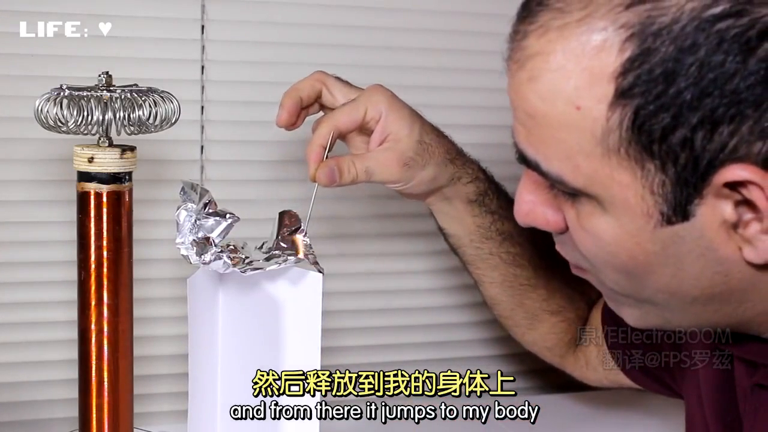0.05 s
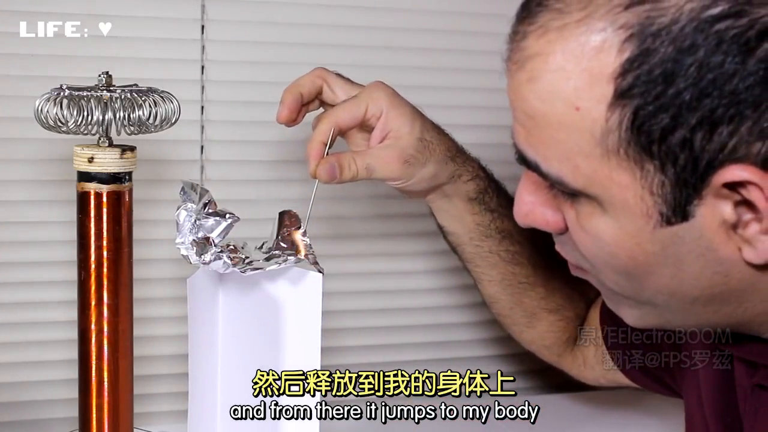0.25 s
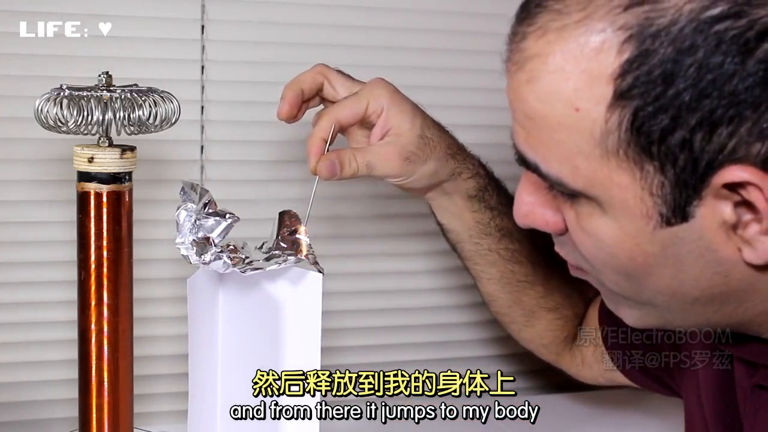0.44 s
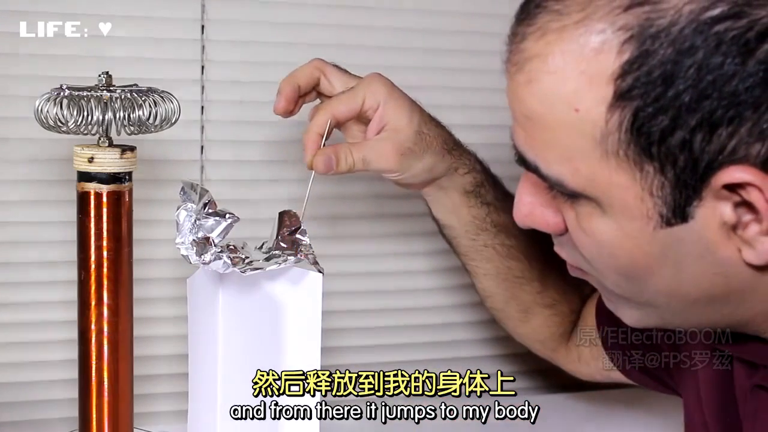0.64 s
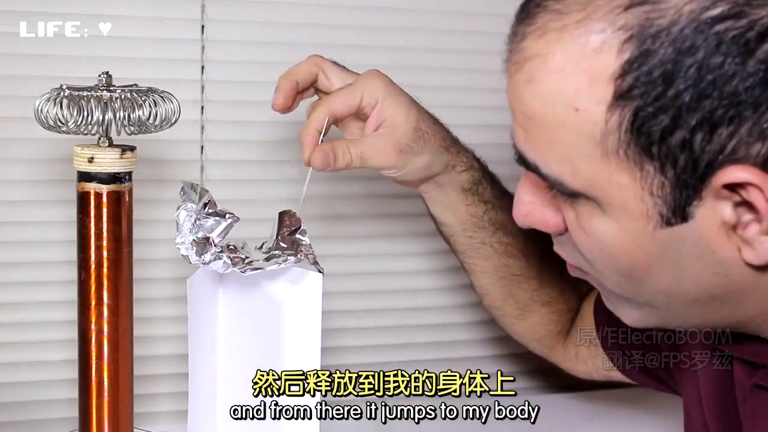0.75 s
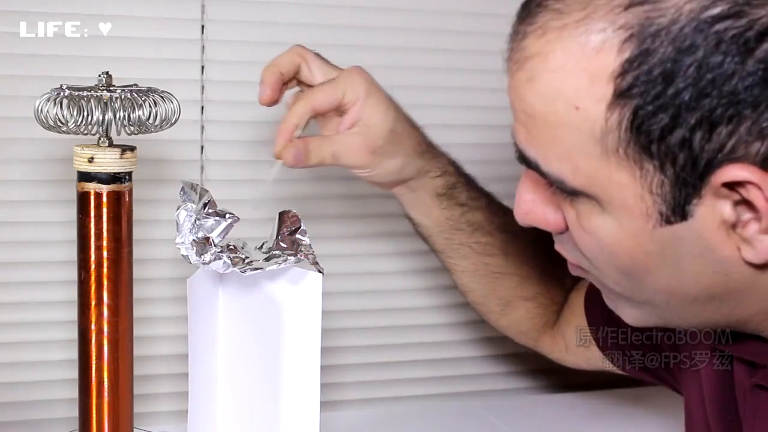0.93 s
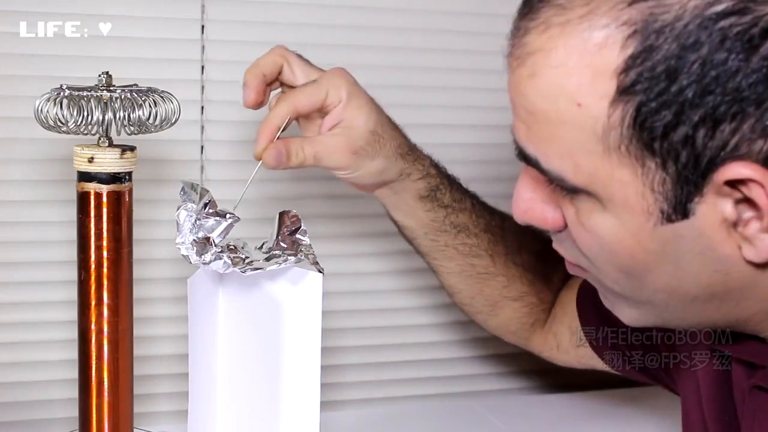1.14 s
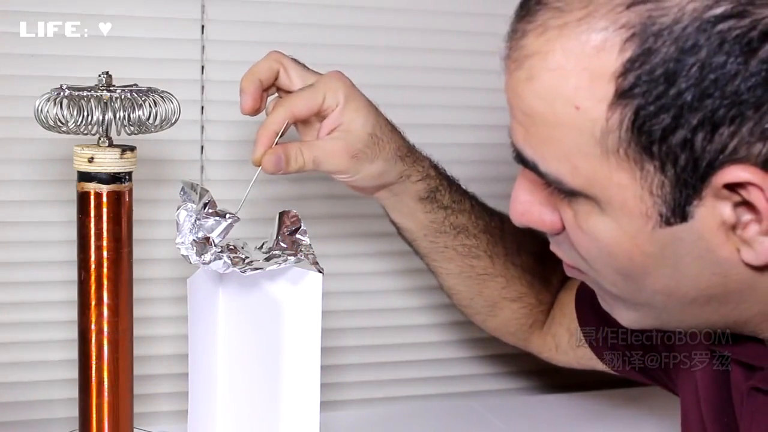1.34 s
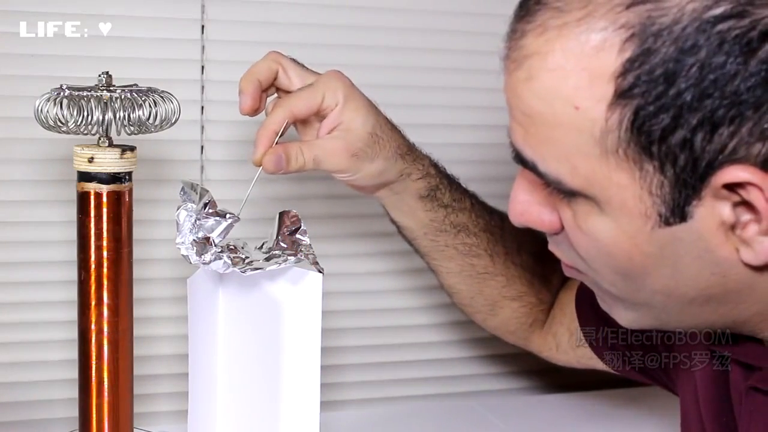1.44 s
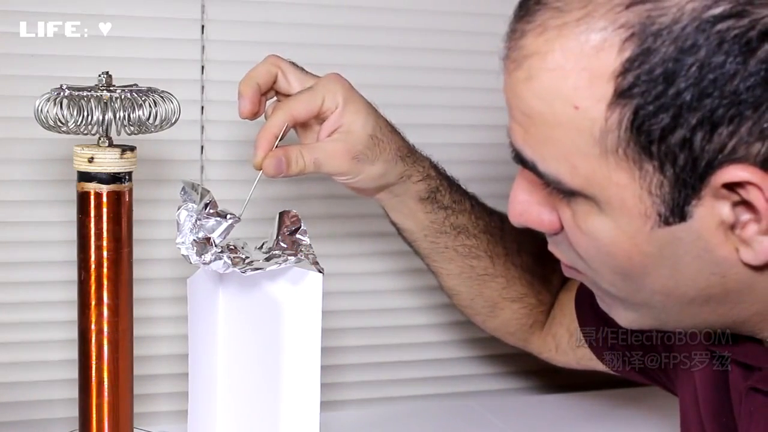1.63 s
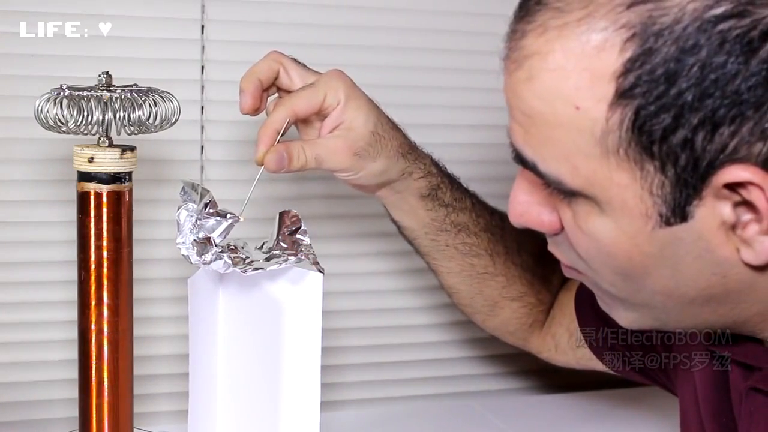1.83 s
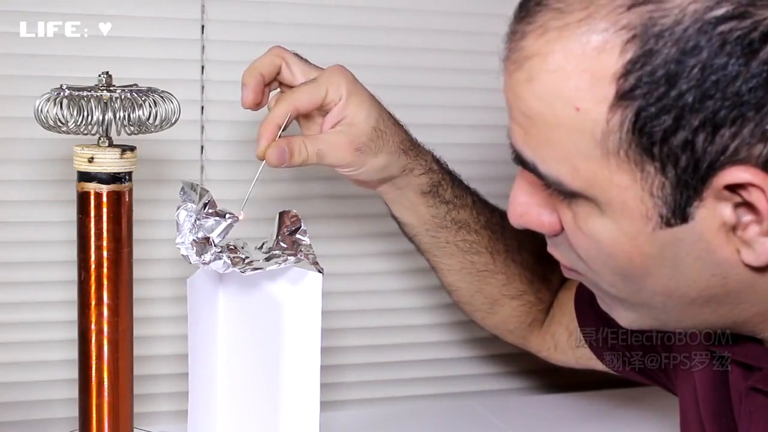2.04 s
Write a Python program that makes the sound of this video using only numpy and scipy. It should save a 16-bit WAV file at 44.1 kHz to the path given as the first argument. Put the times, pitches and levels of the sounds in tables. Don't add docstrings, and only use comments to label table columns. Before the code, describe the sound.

A bright, mains-throbbing electric arc sizzles between a metal needle and crumpled foil, dies abruptly, leaves quiet room hum and hiss, then two dull sputters lead to a weaker, growing fizz; close stereo microphone, small room.

```python
import sys
import numpy as np
from scipy import signal
from scipy.fft import rfft, irfft
from scipy.io import wavfile
from scipy.ndimage import uniform_filter1d

SR = 44100
rng = np.random.default_rng(int(sys.argv[2]) if len(sys.argv) > 2 else 0)


def linear_from_db(decibels):
    return 10 ** (np.asarray(decibels, float) / 20)


def wav_record(signal):
    frames = np.transpose(np.atleast_2d(signal))
    bounded = np.clip(frames, -1, 1)
    quanta = np.round(bounded * 32767).astype(np.int16)
    wavfile.write(sys.argv[1], SR, quanta)


N = 91772


def unit(x):
    return x / np.sqrt(np.mean(x ** 2))


def on_log_hz(points, hz):
    p = np.array(points, float)
    return np.interp(np.log(np.maximum(hz, 1)), np.log(p[:, 0]), p[:, 1])


def colour(x, points):
    hz = np.arange(x.shape[-1] // 2 + 1) * SR / x.shape[-1]
    return irfft(rfft(x) * linear_from_db(on_log_hz(points, hz)), x.shape[-1])


def ring(x, hz, width):
    return signal.lfilter(*signal.iirpeak(hz, hz / width, fs=SR), x)


def walk(rate):
    k = int(SR / rate)
    return unit(uniform_filter1d(uniform_filter1d(rng.standard_normal(N), k), k))


# frequency in Hz, density in dB per Hz.
HISS_COLOUR = [(20, -28), (60, -8.5), (200, -3), (600, -8), (2000, -14.5), (6000, -17.5), (7500, -20.5),
               (15500, -25.5)]
# frequency in Hz, width in Hz, level in dB.
HUM_RINGS = [(41.7, 4, -69.5), (94.4, 13, -64.5), (150, 7.5, -69.5), (183, 45, -59), (355.3, 30, -68.5)]
# frequency in Hz, side minus mid in dB.
BACKGROUND_SIDE = [(60, -3), (110, -9), (200, -5.5), (380, -0.5), (700, 5), (1290, 5), (2380, 5.5),
                   (4400, 2.5), (8120, 1.5), (15000, -2.5)]


def hum_and_hiss():
    hiss_db = -59
    sound = linear_from_db(hiss_db) * unit(colour(rng.standard_normal(N), HISS_COLOUR))
    for hz, width, db in HUM_RINGS:
        sound = sound + linear_from_db(db) * unit(ring(rng.standard_normal(N), hz, width))
    return sound


def background():
    lean_db = -0.5
    mid = hum_and_hiss()
    side = colour(hum_and_hiss(), BACKGROUND_SIDE)
    return np.array([(mid + side) * linear_from_db(lean_db / 2), (mid - side) * linear_from_db(-lean_db / 2)])


def even(response):
    smooth_hz, size = 250, response.shape[1]
    power = np.mean(np.abs(rfft(response)) ** 2, axis=0)
    power = uniform_filter1d(power, size=int(smooth_hz * size / SR))
    taps = np.roll(irfft(1 / np.sqrt(power), size), 256)[:513] * np.hanning(513)
    return signal.fftconvolve(response, taps[None], axes=1)


# frequency in Hz, time to fall 60 dB in seconds.
TAIL_T60 = [(500, 0.74), (1500, 0.26), (2500, 0.35), (4500, 0.34), (6400, 0.3), (7400, 0.24), (10000, 0.12),
            (14000, 0.053)]
# frequency in Hz, side minus mid in dB.
TAIL_SIDE = [(500, -6), (1000, -12.5), (2000, -10.5), (4000, -2), (8000, -7.5), (14000, -17)]
# left delay in ms, right delay in ms, level in dB.
NEAR_ECHOES = [
    (.26, 0.284, -9.5),
    (1.6, 1.58, -9.5),
    (2.18, 2.21, -4.5),
    (2.82, 2.78, -3.5),
]


def room_tail(t):
    tail = 0
    for hz in 350 * 2 ** np.arange(0, 5.6, 1 / 3):
        mid, side = rng.standard_normal((2, len(t)))
        noise = mid + linear_from_db(on_log_hz(TAIL_SIDE, hz)) * side * np.array([[1], [-1]])
        band = ring(ring(noise, hz, hz / 3), hz, hz / 3)
        tail = tail + band * linear_from_db(-60 * t / on_log_hz(TAIL_T60, hz))
    return tail


def room(x):
    tail_db, build_s, left_lag_ms = 2, 0.0037, 0.01
    size = SR // 2
    t = np.arange(size) / SR
    tail = room_tail(t)
    response = linear_from_db(tail_db) * tail * np.clip(t / build_s, 0, 1) / np.sqrt(np.sum(tail ** 2) / 2)
    near = np.arange(256)
    for left_ms, right_ms, db in [(left_lag_ms, 0, 0)] + NEAR_ECHOES:
        delay = np.array([[left_ms], [right_ms]]) * SR / 1000
        response[:, near] += linear_from_db(db) * np.sinc(near - 16 - delay)
    response = even(response)
    lead = np.concatenate([x[size:0:-1], x])
    start = size + 272
    wet = signal.fftconvolve(lead[None], response, axes=1)[:, start:start + N]
    return wet / np.sqrt(np.sum(response ** 2) / 2)


def snaps():
    per_s, spread_db, top_db = 6000, 2.5, 9
    hit = rng.random(N) < per_s / SR
    level_db = np.minimum(spread_db * rng.exponential(size=N), top_db)
    return unit(hit * rng.choice([-1, 1], N) * linear_from_db(level_db))


def body(x, points, rings, ring_db):
    wander_db = 1.5
    rung = 0
    for hz, width, db in rings:
        rung = rung + linear_from_db(db + wander_db * walk(14.4)) * unit(ring(x, hz, width))
    return unit(unit(colour(x, points)) + linear_from_db(ring_db) * unit(rung))


# start in seconds, level in dB, rise in s, hold in s, 60 dB fall in s.
TOUCHES = [
    (1.655, -40, 0.013, 0.03, 0.086),
    (1.74, -37.5, 0.0063, 0.0023, 0.11),
]
# frequency in Hz, density in dB per Hz.
TOUCH_COLOUR = [(290, -37), (500, -16), (1010, -8), (1090, -9), (1820, -4.5), (2290, -9), (6000, -10.5),
                (13600, -45), (15500, -53)]
# frequency in Hz, width in Hz, level in dB.
TOUCH_RINGS = [(1026, 14, -2), (1395, 48, -6), (1820, 140, -1.5), (3300, 200, -7), (4350, 290, 0),
               (5400, 150, -4), (9900, 300, -9.5)]


def sputter(t):
    shape = 0
    for at, db, rise, hold, t60 in TOUCHES:
        swell = np.clip((t - at) / rise, 0, 1)
        fall = linear_from_db(-60 * np.clip(t - at - rise - hold, 0, 1) / t60)
        shape = shape + linear_from_db(db) * swell * fall
    return shape * body(snaps(), TOUCH_COLOUR, TOUCH_RINGS, ring_db=-4)


# time in seconds, level in dB, treble lift in dB.
STRONG_ARC = [
    (0, -23.5, 7),
    (.06, -26.5, 4.5),
    (.12, -27.5, 5),
    (.23, -22.5, 7.5),
    (.35, -25, 2.5),
    (0.408, -23, 6),
    (.6, -25.5, 4),
    (0.666, -29.5, 2),
    (0.701, -61.5, 21.5),
]
# time in seconds, level in dB, treble lift in dB.
WEAK_ARC = [
    (1.615, -56, -9),
    (1.635, -51.5, -5),
    (1.8, -53, 3),
    (1.83, -45.5, -2),
    (1.915, -45.5, 2.5),
    (1.935, -42, -3),
    (2.004, -42, 4.5),
    (2.029, -33, -1),
    (2.08, -35.5, 3),
]
# frequency in Hz, density in dB per Hz.
STRONG_COLOUR = [(300, -37), (700, -22), (1300, -20), (1700, -5.5), (5500, -1.5), (7200, -8.5),
                 (10000, -12), (15500, -31.5)]
# frequency in Hz, width in Hz, level in dB.
STRONG_RINGS = [(291, 16, -17), (788, 16, -20), (1260, 110, 0), (1641, 110, 3), (2085, 103, -1.5),
                (2360, 240, -2), (3395, 430, 6.5), (4730, 160, 4), (5170, 100, -20), (5430, 110, 3),
                (9170, 400, 3.5), (10400, 600, -3), (11560, 470, -2.5), (12200, 250, -12)]
# frequency in Hz, density in dB per Hz.
WEAK_COLOUR = [(290, -8), (500, -8), (1700, 0.5), (2890, -4.5), (3900, -8.5), (5920, -2.5), (7340, -14),
               (9930, -9.5), (15500, -22.5)]
# frequency in Hz, width in Hz, level in dB.
WEAK_RINGS = [(2020, 20, -1), (3410, 54, 3.5), (3890, 200, 5), (5820, 52, 1), (6640, 29, -17),
              (8600, 80, -11), (9700, 94, -5), (9700, 89, -14)]


def arc(t):
    mains_hz, throb_db, throb_sharp, double_throb_db = 60.1, 6, 5.0, .8
    flicker_db, bright_hz, foil_db = .6, 7240, -6
    strong = t < 1
    phase_turns = np.where(strong, 0.0033, .5)
    turn = 2 * np.pi * (mains_hz * t - phase_turns)
    throb = throb_db * np.exp(throb_sharp * (np.cos(turn) - 1)) + double_throb_db * np.cos(2 * turn)
    throb_share = np.where(strong, 1, .25)
    clicks = snaps() * linear_from_db(throb * throb_share + flicker_db * walk(60))
    strong_hiss = body(clicks, STRONG_COLOUR, STRONG_RINGS, foil_db)
    weak_hiss = body(clicks, WEAK_COLOUR, WEAK_RINGS, foil_db)
    hiss = np.where(strong, strong_hiss, weak_hiss)

    silence = [(.72, -134.5, 0.0034), (1.6, -93, 0)]
    at, level_db, treble_db = np.array(STRONG_ARC + silence + WEAK_ARC, float).T
    top = signal.sosfilt(signal.butter(2, bright_hz, "high", fs=SR, output="sos"), hiss)
    lift_db = np.interp(t, at, treble_db) + 1.1 * throb * (t > 1)
    hiss = hiss + (linear_from_db(lift_db) - 1) * top
    return hiss * linear_from_db(np.interp(t, at, level_db))


def scene():
    creep_turns_per_s = .35
    t = np.arange(N) / SR
    sparks = arc(t) + sputter(t)
    place = 2 * np.pi * creep_turns_per_s * t
    return room(sparks * np.cos(place) ** 2) + room(sparks * np.sin(place) ** 2) + background()


def roll_off(x):
    return signal.sosfilt(signal.butter(12, 15780, fs=SR, output="sos"), x)


def record(dry):
    top_cut = signal.ellip(8, .1, 50, 15400, fs=SR, output="sos")
    mix = signal.sosfiltfilt(top_cut, dry)
    return roll_off(mix)


dry = scene()
out = record(dry)
wav_record(out)
```